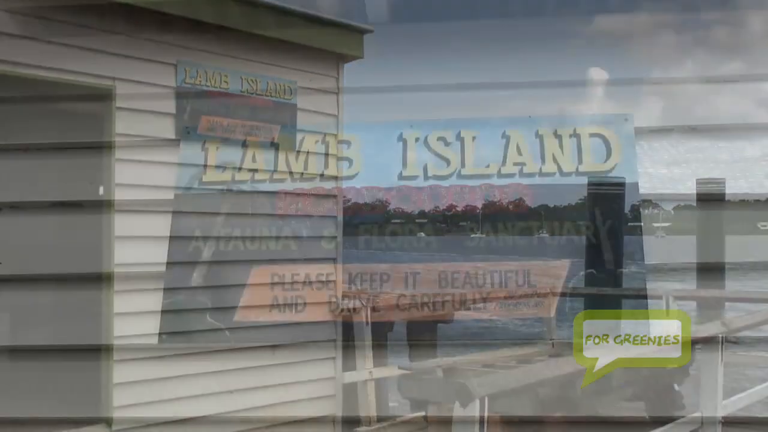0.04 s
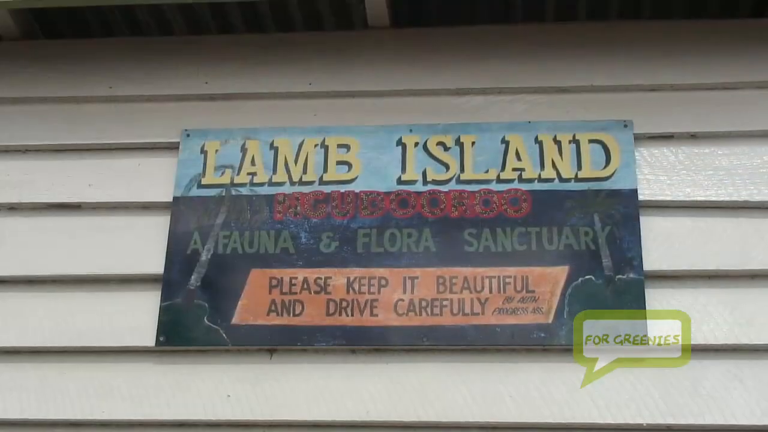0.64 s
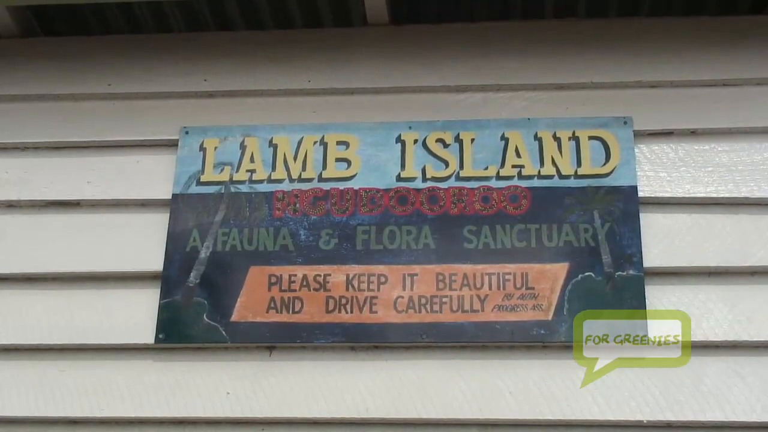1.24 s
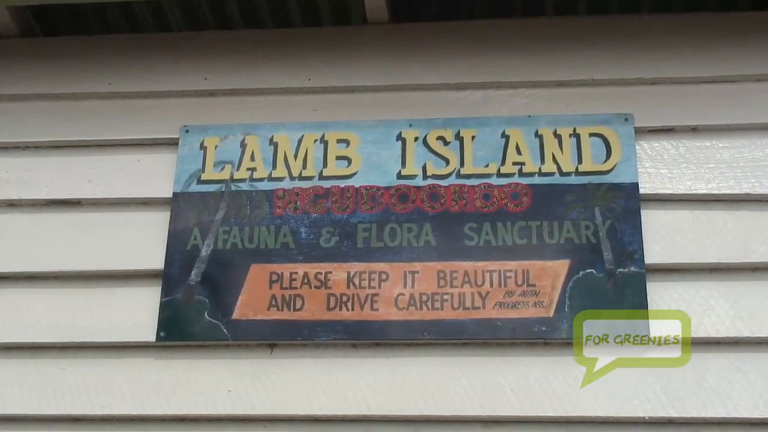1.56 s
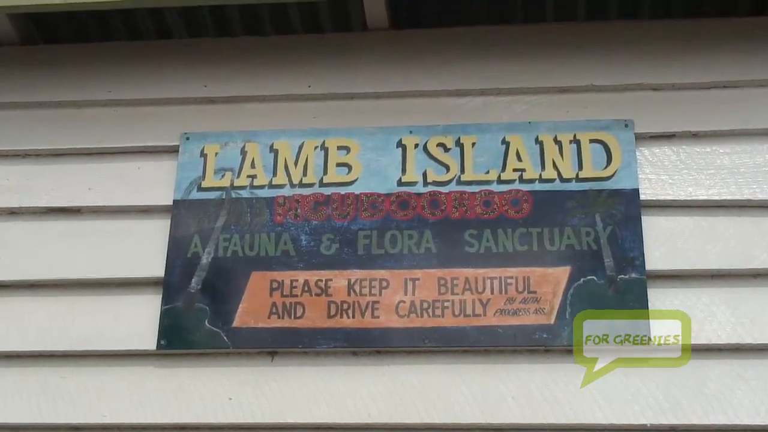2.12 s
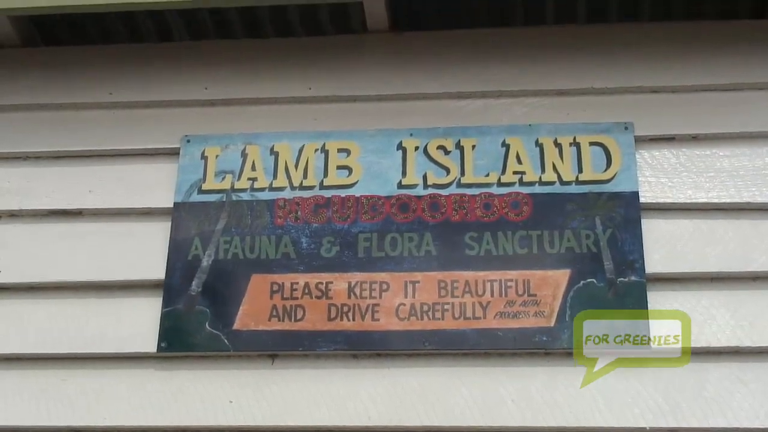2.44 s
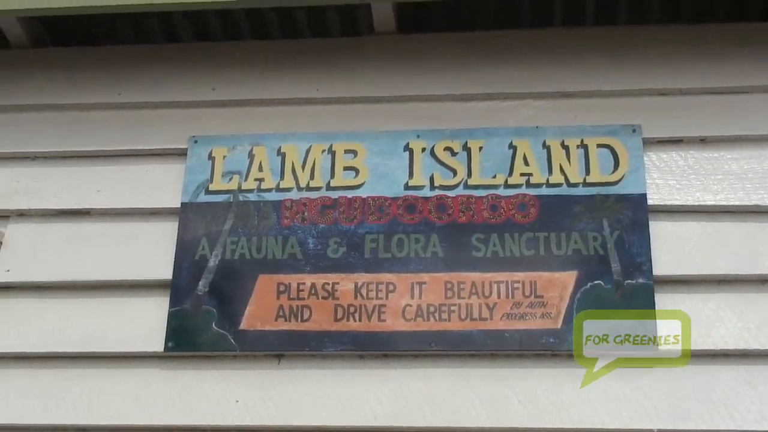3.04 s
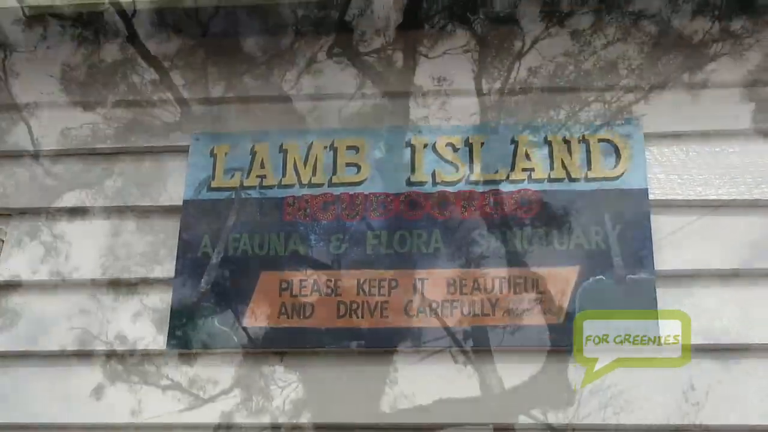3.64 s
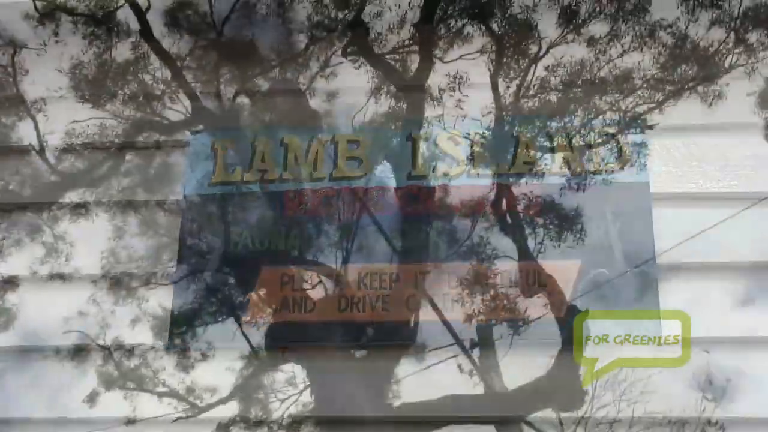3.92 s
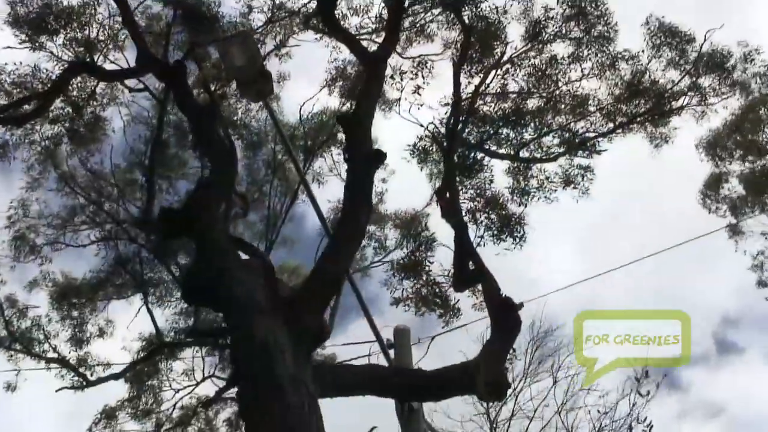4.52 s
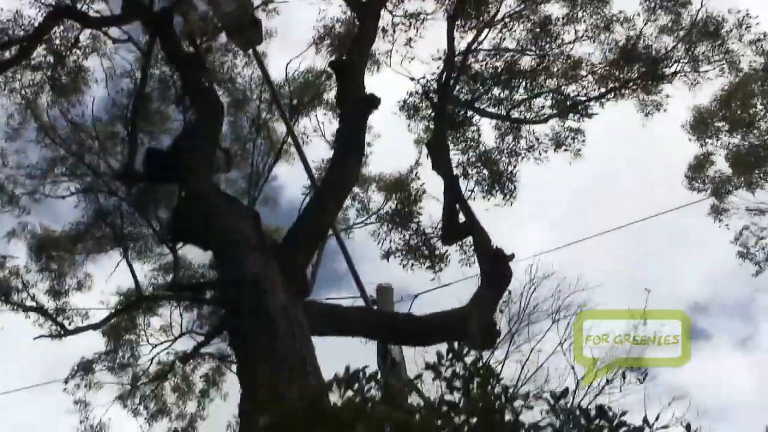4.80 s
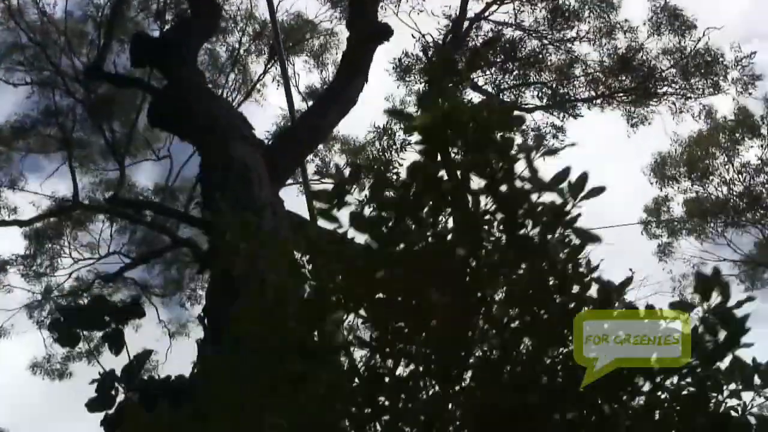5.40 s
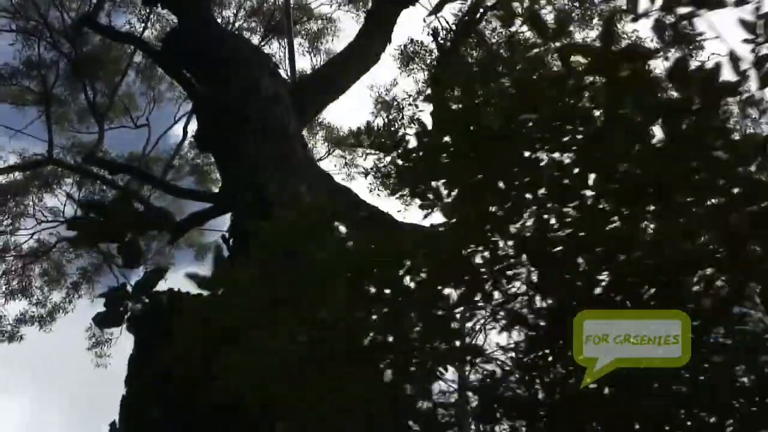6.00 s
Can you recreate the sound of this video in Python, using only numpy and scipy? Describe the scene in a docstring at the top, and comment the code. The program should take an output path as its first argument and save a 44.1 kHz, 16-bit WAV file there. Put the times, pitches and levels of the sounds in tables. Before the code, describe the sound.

Six harsh, evenly spaced crow caws outdoors over light wind, followed by faint insect buzzing and a few soft microphone bumps.

```python
"""A crow caws six times from a tree. Its voice box sends out quick pulses that ring in throat and beak;
each caw starts hoarse, clears at the top of its pitch and breaks up again.
Wind, a far engine and a small bird's chips lie behind it. Near four seconds the sound cuts to a
quieter scene, with insects buzzing in the leaves and a few soft bumps on the microphone.
A faint hum runs throughout."""
import sys
import numpy as np
from scipy import signal
from scipy.fft import rfft, irfft, next_fast_len
from scipy.io import wavfile
from scipy.ndimage import uniform_filter1d, map_coordinates

SR = 44100
rng = np.random.default_rng(int(sys.argv[2]) if len(sys.argv) > 2 else 0)


def pcm_store(signal):
    """Save signal as 16-bit PCM."""
    levels = np.round(np.clip(np.atleast_2d(signal), -1, 1) * 32767)
    wavfile.write(sys.argv[1], SR, levels.astype(np.int16).T)


N = 276066


def amp(db):
    """Turn decibels into a number to multiply by."""
    return 10 ** (np.asarray(db) / 20)


def unit(x):
    """Scale x to an average strength (rms) of 1."""
    return x / np.sqrt(np.mean(x ** 2) + 1e-20)


def clock():
    """The time of every sample, in seconds."""
    return np.arange(N) / SR


def along(points, hz):
    """Read between (frequency, value) points, spaced by octaves."""
    freqs, values = np.transpose(points)
    return np.interp(np.log(hz + 1), np.log(freqs + 1), values)


def fader(points):
    """A gain for every sample, gliding between (time, decibels) points."""
    return amp(np.interp(clock(), *np.transpose(points)))


def swell(t, at, half_s):
    """A smooth hump of height 1 around a moment."""
    return np.exp(-((t - at) / half_s) ** 2)


def wobble(rate):
    """A smooth curve through `rate` random values a second."""
    return map_coordinates(rng.standard_normal(4096), [clock() * rate], mode="wrap")


def filtered(x, response):
    """Turn each frequency in x up or down by response(hz)."""
    size = next_fast_len(N + SR // 4)
    return irfft(rfft(x, size) * response(np.fft.rfftfreq(size, 1 / SR)), size)[:N]


def resonate(x, hz, width_hz):
    """Let x ring in a band around hz, which may move."""
    turn = np.exp(2j * np.pi * np.cumsum(hz + np.zeros(len(x))) / SR)
    pole = np.exp(-np.pi * abs(width_hz) / SR)
    return (turn * signal.lfilter([(1 - pole) ** 2], [1, -2 * pole, pole ** 2], x / turn)).real


def rush(spectrum, patchy_db):
    """Shaped noise of strength 1, with random louder and softer patches."""
    bands = signal.stft(rng.standard_normal(N), nperseg=512)[2]
    patches = uniform_filter1d(rng.standard_normal(bands.shape), size=6, axis=0)
    patches = uniform_filter1d(patches, size=16, axis=1)
    noise = signal.istft(bands * amp(patchy_db * unit(patches)), nperseg=512)[1][:N]
    return unit(filtered(noise, lambda hz: amp(along(spectrum, hz))))


def hush():
    """The soft background noise of the quieter scene."""
    # tone of the hush: frequency_hz, relative_db
    spectrum = [(24, -57), (40, -18), (119, -7.5), (142, -5), (244, -6), (568, -0.5), (627, -5),
                (676, -3.5), (1060, -0.5), (1200, -5.5), (1460, -7), (1920, -9), (6140, -16), (7870, -18.5),
                (15000, -28.5)]
    return amp(-61.5) * rush(spectrum, patchy_db=0.8)


def insects():
    """One insect scrapes its wings about 51 times a second; another hisses higher, in short phrases."""
    # loudness of the scraping insect: time_s, level_db
    buzz_levels = [(0, -73.5), (4.6, -78), (4.9, -73), (5.9, -70.5), (6.26, -75)]
    # phrases of the hissing insect: middle_s, level_db
    lisps = [(4.126, -77), (4.46, -76), (4.85, -75.5), (5.215, -72.5), (5.52, -76), (5.73, -73),
             (6.16, -74)]
    t = clock()
    strokes = np.cumsum(51.1 + 0.15 * wobble(6.5)) / SR
    scrape = rng.standard_normal(N) * (0.29 + np.exp(-(strokes % 1) / 0.12))
    buzz = fader(buzz_levels) * unit(resonate(scrape, 7790, 850))
    phrases = sum(amp(db) * swell(t, middle, half_s=0.14) for middle, db in lisps)
    hiss = rng.standard_normal(N)
    return buzz + phrases * unit(resonate(hiss, 9700, 700) + .6 * resonate(hiss, 11250, 1000))


def hum(tones, drift_rad, waver_db):
    """Low engine tones that drift in timing and strength."""
    out = np.zeros(N)
    for hz, db in tones:
        strength = np.sqrt(2) * amp(db + waver_db * wobble(3.69))
        out += strength * np.sin(2 * np.pi * hz * clock() + drift_rad * wobble(3.14))
    return out


def far_hum():
    """A faint, wavering hum from far away."""
    # its single tone: pitch_hz, level_db
    tones = [(150.7, -76.5)]
    return hum(tones, drift_rad=.5, waver_db=2)


def bumps():
    """Soft knocks on the microphone: a low thud and a faint tick, trailing off in a dull rustle."""
    # the firmer knocks: start_s, relative_db, pitch_hz
    knocks = [(.003, -49.5, 187), (4.0, -58, 118), (5.525, -61, 134), (5.569, -52, 194), (5.68, -57, 304),
              (5.799, -54, 183), (5.94, -52, 183)]
    # five light touches fall at random between 5.58 and 6 seconds
    touches = [(5.58 + .42 * when, -57.5 + 4 * (force - .5), 148 * 2 ** (tone - .5))
               for when, force, tone in rng.random(size=(5, 3))]
    out, t = np.zeros(N + SR), np.arange(SR // 3) / SR
    onset = 1 - np.exp(-t / 0.00078)
    for start, db, hz in list(knocks) + touches:
        noise = rng.standard_normal(len(t))
        thud = np.sin(2 * np.pi * hz * t) * amp(-60 * t / 0.061)
        rustle = amp(-13.5) * unit(resonate(noise, hz, 480)) * amp(-60 * t / 0.39)
        tick = amp(-29) * noise * amp(-60 * t / .008)
        out[int(start * SR):][:len(t)] += amp(db + 5) * (thud + rustle + tick) * onset
    return out[:N]


def engine():
    """A far engine idles, humming at multiples of its firing rate, then fades."""
    # its tones: firing_multiple, relative_db
    harmonics = [(2, -89.5), (3, -79), (4, -74.5), (8, -79.5)]
    # its swell and fade: time_s, gain_db
    levels = [(0, -4), (.6, 6.5), (3.25, 5.5), (3.7, -7)]
    firing_hz = 41
    tones = [(multiple * firing_hz, db) for multiple, db in harmonics]
    return hum(tones, drift_rad=.4, waver_db=1.5) * fader(levels)


def wind():
    """Moving air makes a broad rush and a low rumble that rise and fall together."""
    # strength of the wind: time_s, relative_db
    gusts = [(0.15, -58), (0.34, -58.5), (0.71, -56.5), (1.56, -58), (1.8, -56), (2.7, -59.5), (3.45, -56),
             (3.78, -58.5), (3.9, -59)]
    # tone of the rush: frequency_hz, relative_db
    rush_tone = [(120, -35), (200, -12), (332, 0), (412, -1), (929, 1.5), (1310, -2), (2800, -8),
                 (3540, -13), (4470, -13), (6080, -16.5), (8570, -26), (11600, -25.5), (15000, -35)]
    # tone of the rumble: frequency_hz, relative_db
    rumble_tone = [(25, -3.5), (55, -19), (100, -3.5), (190, -5), (260, -3), (500, -68)]
    air = amp(4) * rush(rush_tone, patchy_db=1.3) + amp(-10.5) * rush(rumble_tone, patchy_db=2.5)
    return fader(gusts) * air


def below_top(t, length, sag):
    """How many Hz a caw is under its top pitch: a quick rise, a sag, then a drop as effort gives out."""
    rise_s, rise_hz, drop_hz = 0.074, 97.66, 104.3
    rise = rise_hz * np.cos(np.pi / 2 * np.clip(t / rise_s, 0, 1)) ** 2
    after = np.maximum(t - rise_s, 0)
    return rise + sag * after + drop_hz * (after / (length - rise_s)) ** 4.2


def voice_box(pitch, rough, rasp, jitter, scatter_db):
    """One sharp pulse and a puff of noise per cycle; rough makes pulses uneven, rasp swells the puffs."""
    n = len(pitch)
    cycles = np.cumsum(pitch) / SR
    at = np.interp(np.arange(1, int(cycles[-1])), cycles, np.arange(n))  # pulse positions in samples
    chance = rng.standard_normal((256, 2))[:len(at)]
    loose = rough[at.astype(int)]
    at = at + jitter * loose * chance[:, 0] * SR / pitch[at.astype(int)]
    # spread each pulse over nearby samples, so it can fall between two
    nearby = at.astype(int)[:, None] + np.arange(-8, 9)
    offset = nearby - at[:, None]
    shape = np.sinc(offset) * np.cos(np.pi * offset / 18) ** 2
    sizes = amp(scatter_db * loose * chance[:, 1])
    pulses = np.bincount(np.clip(nearby, 0, n - 1).ravel(), (shape * sizes[:, None]).ravel(), n)
    breath = signal.lfilter(*signal.butter(3, 2800, fs=SR), rng.standard_normal(SR))[:n]
    puffs = breath * np.exp(-3 * (cycles % 1))
    return unit(pulses) + rasp * unit(puffs)


def throat(source, bands, closing):
    """The voice rings in bands that shift as throat and beak close; the result is held at strength 1."""
    ring = sum(amp(db) * resonate(source, hz * (1 - shift * closing), width)
               for hz, width, db, shift in bands)
    window = np.hanning(SR // 50)
    power = signal.fftconvolve(ring ** 2, window / window.sum(), "same")
    return ring / np.sqrt(np.abs(power) + 1e-12)


def crow():
    """Effort lifts the pitch and steadies the voice; throat and beak open late, so the ringing glides."""
    # the caws: start_s, length_s, top_hz, sag_hz_per_s, beak_lag_s, hoarseness, bright_tuning_ratio,
    # relative_db, then on top of that: first_croak_db, dip_db, last_croak_db, nasal_db, bright_db, top_db
    caws = [(.753, 0.19, 382.7, 174, 0.051, 0.64, 1.01, -36, -2.5, -11, 7, -17, -9, -22),
            (1.171, 0.19, 393.3, 210, 0.035, 0.37, 0.994, -37, -1.5, -2.5, 6, -19.5, -3.5, -18.5),
            (1.617, 0.19, 389.3, 21.6, 0.047, 1.1, 0.96, -36, 0.5, -4, 2.5, -16.5, -7.5, -21),
            (2.07, 0.2, 387.3, 190, 0.035, 0.63, 1.01, -36.5, 4.5, -3, 4.5, -34, -6.5, -16.5),
            (2.524, .183, 386, 184, 0.043, .25, 1.017, -35.5, -4, -4.5, 8, -23.5, -10.5, -24.5),
            (2.99, 0.19, 387.1, 166, 0.051, 0.64, 1.004, -35, -2, -6.5, 4.5, -22, -9, -22.5)]
    # five rings of throat and beak: open_beak_hz, width_hz, relative_db, share_of_hz_lost_on_closing
    low_ring = [(1573, 345, 9, 0.14), (1923, 272, 10.5, 0.072), (2204, 480, -4.5, 0.0099),
                (804, 300, -10.5, 0.016)]
    middle_ring = [(3054, 116, 14, -0.092), (2740, 63, 5, 0.113)]
    nasal_ring = [(4170, 1400, -1.1, 0.13), (5080, 330, 1, 0.112)]
    bright_ring = [(5960, 850, 0, .09), (8350, 480, -12, .12)]  # retuned a little for each caw
    top_ring = [(11600, 1150, 0, .11), (9900, 500, -10, .07), (13300, 600, -9, .06)]
    # how each ring's level changes, low to top: slack_voice_db, closed_beak_db, share_of_last_croak
    responses = [(-8, -5, 0.54), (-12, -5, 0.13), (-4.5, 5, 0.37), (-22, -2.5, 1), (-7, -9.5, 0.95)]
    slack_hz = 98.4  # this far under the top pitch, the voice is slack and the beak closed
    attack_s, release_s = 0.018, .013
    out = np.zeros(N)
    waver = 1 + .004 * wobble(85)
    for (start, length, top_hz, sag, lag, hoarse, tuning,
         db, first_db, dip_db, last_db, nasal_db, bright_db, top_db) in caws:
        t = np.arange(int(length * SR)) / SR
        span = slice(int(start * SR), int(start * SR) + len(t))
        under_hz = below_top(t, length, sag)
        pitch = (top_hz - under_hz) * waver[span]
        slack = under_hz / slack_hz
        # the throat narrows late, while the beak shuts as soon as the effort falls
        narrow = np.clip(below_top(t - lag, length, sag) / slack_hz, 0, 1)
        closing = np.clip(slack, narrow, 1)
        # as the pitch falls, the clear voice turns hoarse, then uneven, then dull
        rasp = .2 + hoarse * np.interp(pitch, [340, 360, 376], [.7, .28, 0])
        rough = .06 + hoarse * np.interp(pitch, [300, 328, 355], [.9, .28, 0])
        dull_db = np.interp(pitch, [288, 312], [-11, 0])
        source = voice_box(pitch, rough, rasp, jitter=.055, scatter_db=2)
        # the voice breaks going up and coming down; the low ring falters just before the last croak
        first_croak = first_db * swell(t, 0.048, half_s=0.014)
        dip = dip_db * swell(t, length - 0.049, half_s=.012)
        last_croak = last_db * swell(t, length - 0.028, half_s=0.014)
        tuned_bright = [(tuning * hz, *rest) for hz, *rest in bright_ring]
        rings = [(low_ring, dip, narrow),
                 (middle_ring, -11 + dull_db / 2, narrow),
                 (nasal_ring, nasal_db + dull_db, closing),
                 (tuned_bright, bright_db + dull_db, closing),
                 (top_ring, top_db + dull_db, closing)]
        voice = np.zeros(len(t))
        for (bands, ring_db, shape), (slack_db, closed_db, share) in zip(rings, responses):
            gain = amp(ring_db + slack_db * slack + closed_db * closing + share * last_croak)
            voice += gain * throat(source, bands, shape)
        fade = np.minimum(t / attack_s, 1) * np.minimum((length - t) / release_s, 1)
        out[span] = amp(db + first_croak) * voice * fade
    # the small throat gives off no bass, and the air takes the highest treble
    return filtered(out, lambda hz: hz ** 4 / (hz ** 4 + 480 ** 4) / (1 + (hz / 14000) ** 16))


def tree_echoes(call, early_db, late_db):
    """Ground and branches scatter the call at once; trees further off return a faint, long tail."""
    # how long the tail lasts: frequency_hz, time_to_fall_60_db_s
    decays = [(300, 0.96), (1800, 0.67), (6000, 0.57), (12000, 0.11)]
    t = np.arange(SR // 8) / SR
    scatter = rng.standard_normal(len(t)) * amp(-60 * t / 0.041)
    near = signal.fftconvolve(call, scatter / np.linalg.norm(scatter))[:N]
    near = filtered(near, lambda hz: 1 / (1 + (hz / 10000) ** 2))
    hz, t, bands = signal.stft(rng.standard_normal(SR), SR, nperseg=256)
    fade = amp(-60 * t / along(decays, hz)[:, None]) * (1 - np.exp(-t / 0.0017))
    tail = signal.istft(bands * fade, SR, nperseg=256)[1]
    far = signal.fftconvolve(call, tail / np.linalg.norm(tail))[:N]
    return amp(early_db) * near + amp(late_db) * far


def small_bird(level_db):
    """A far bird gives brief, thin, quivering chips."""
    # the chips: middle_s, pitch_hz
    chips = [(2.902, 3850), (3.852, 2900), (3.858, 4600), (3.883, 3950)]
    t = clock()
    quiver = 1.3 * wobble(400)
    return amp(level_db) * sum(swell(t, middle, half_s=.01) * np.sin(2 * np.pi * hz * t + quiver)
                               for middle, hz in chips)


def scene():
    """The crow over wind and engine, then a cut to a quieter insect scene, also heard briefly at first."""
    wind_from_s, cut_s = .11, 3.965
    fade_times = [wind_from_s - .035, wind_from_s + .035, cut_s - .008, cut_s + .008]
    windy = np.interp(clock(), fade_times, [0, 1, 1, 0])
    caws = crow()
    voice = amp(1.5) * caws + tree_echoes(caws, early_db=-5, late_db=-11.5)
    distant = far_hum() + small_bird(level_db=-61)
    background = windy * (engine() + wind()) + (1 - windy) * (hush() + insects())
    return (voice + distant + background + bumps())[None]


def record(dry):
    """The camera's microphone thins the deep bass and loses the very highest treble."""
    bass_hz, top_hz = 35, 15200
    return filtered(dry[0], lambda hz: (hz < top_hz) * hz ** 2 / (hz ** 2 + bass_hz ** 2))[None]


dry = scene()
out = record(dry)
pcm_store(out)
```